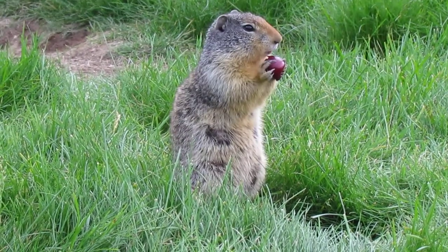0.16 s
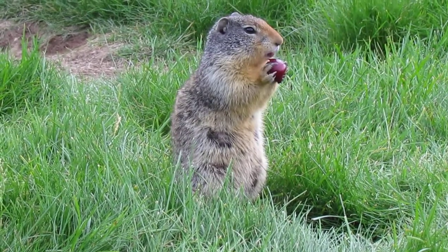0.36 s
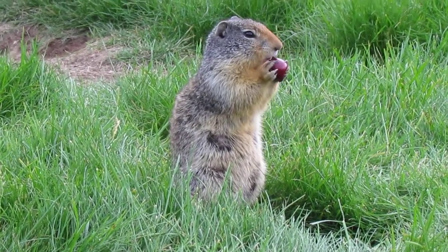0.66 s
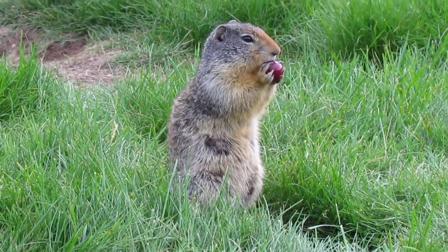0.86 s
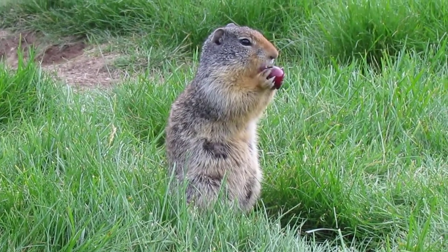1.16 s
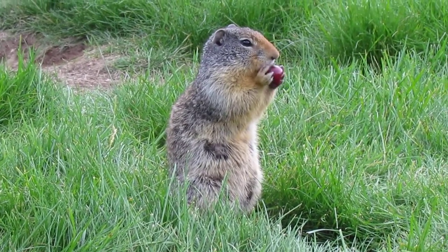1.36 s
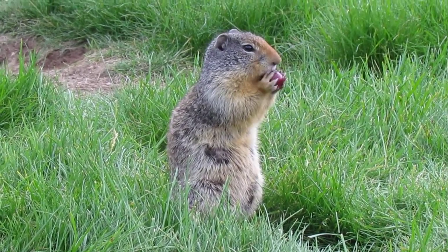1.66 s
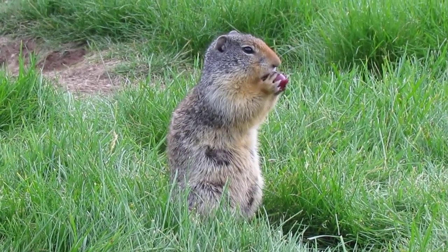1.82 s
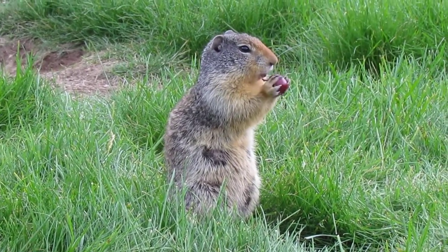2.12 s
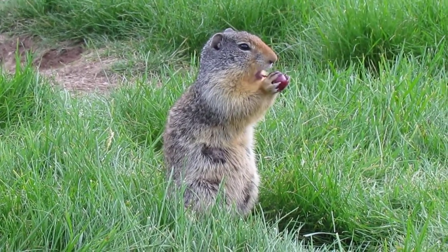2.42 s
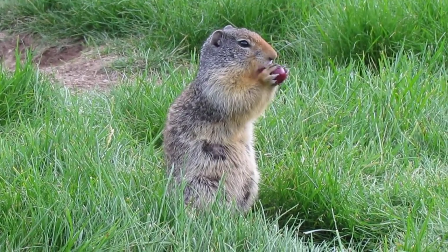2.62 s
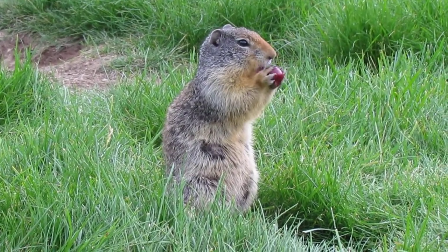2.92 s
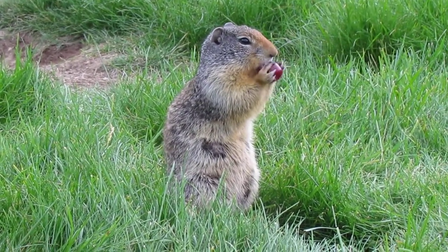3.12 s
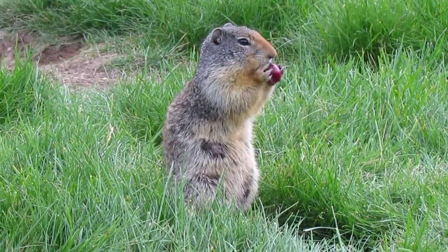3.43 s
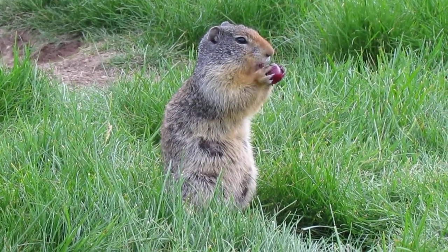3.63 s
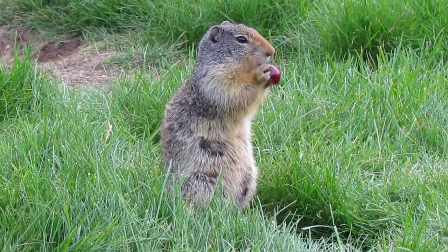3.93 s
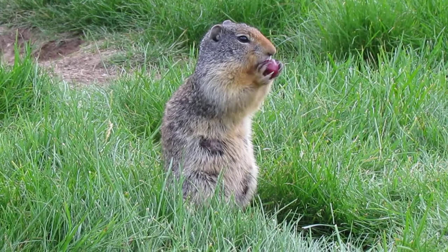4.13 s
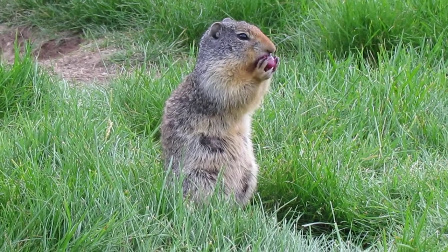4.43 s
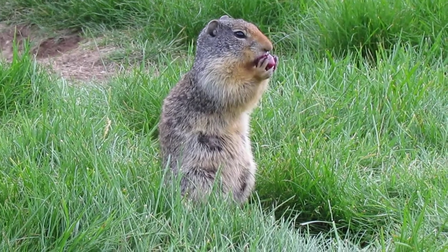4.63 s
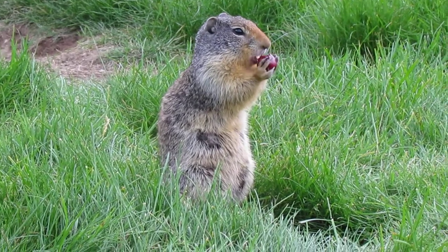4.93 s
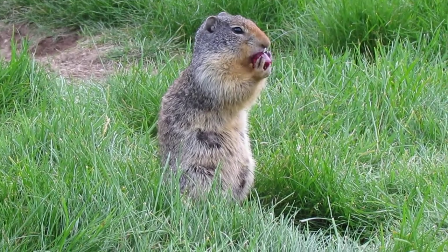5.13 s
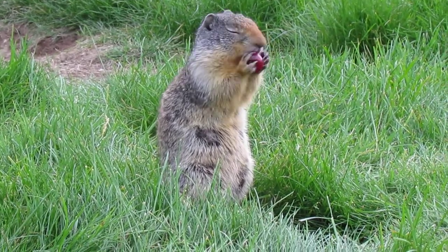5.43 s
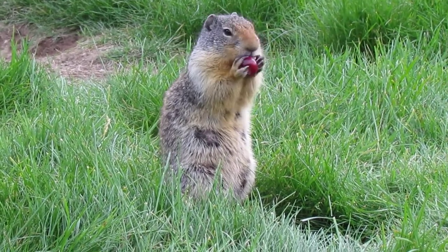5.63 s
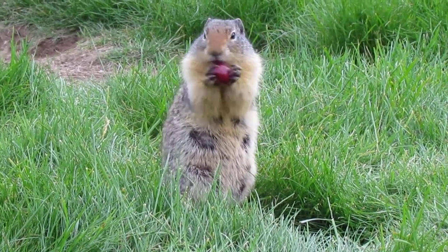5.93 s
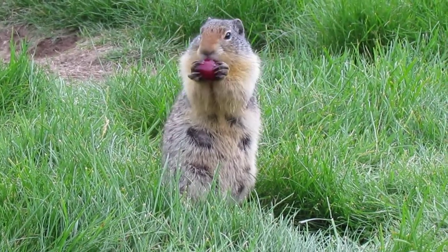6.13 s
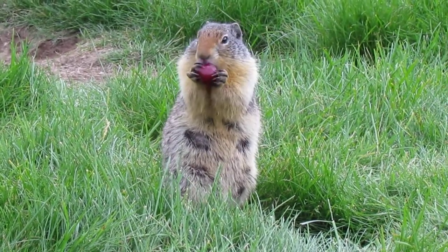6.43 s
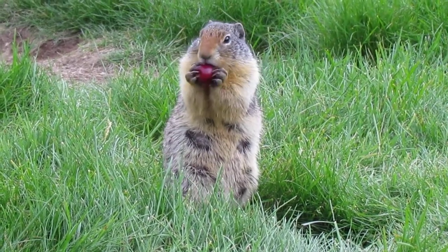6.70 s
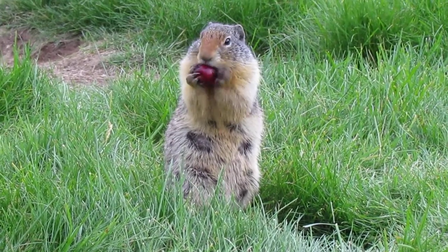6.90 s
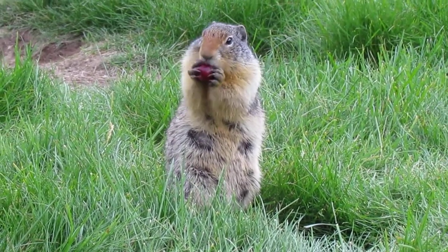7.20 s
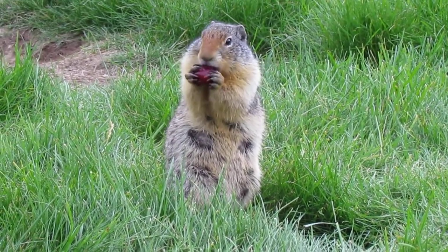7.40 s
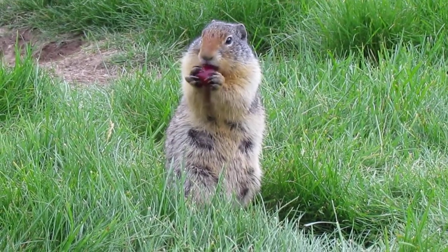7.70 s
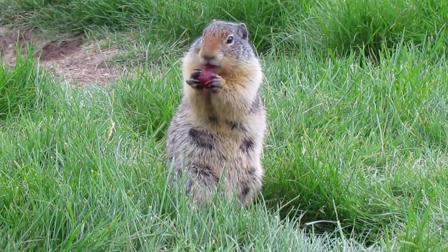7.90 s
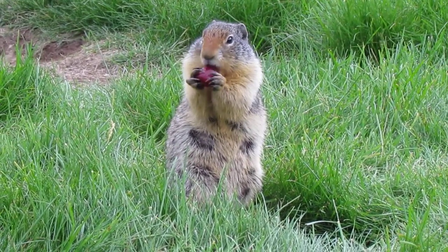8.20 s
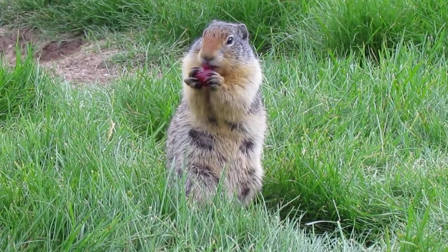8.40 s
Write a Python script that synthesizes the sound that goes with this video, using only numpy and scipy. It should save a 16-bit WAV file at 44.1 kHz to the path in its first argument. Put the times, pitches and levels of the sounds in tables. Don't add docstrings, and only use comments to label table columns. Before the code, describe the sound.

A small rodent gnaws fruit with faint crisp ticks and rustles while squirrels call around it: loud, clean, high peeps every couple of seconds, answered by distant quieter ones, with echoes off slopes and trees. A quiet outdoor hum and hiss lies behind. From the middle onward, irregular bassy wind buffets the left microphone hard, turning into heavy rumbling thuds with rough flutter, while the right stays much calmer.

```python
import sys
import numpy as np
from scipy import signal
from scipy.fft import rfft, irfft, next_fast_len
from scipy.io import wavfile
from scipy.ndimage import uniform_filter1d, map_coordinates

SR = 44100
rng = np.random.default_rng(int(sys.argv[2]) if len(sys.argv) > 2 else 0)


def linear_from_db(decibels):
    return 10 ** (np.asarray(decibels, float) / 20)


def store_pcm(level_fs):
    pcm = np.round(np.clip(level_fs, -1, 1) * 32767).astype(np.int16)
    wavfile.write(sys.argv[1], SR, np.atleast_2d(pcm).T)


N = 377055
T = np.arange(N) / SR

# [t/s, peak level/dB, f/Hz]
EDDIES = [(2.824, -24.5, 131.9), (2.922, -16, 138.1), (3.331, -22.5, 122), (3.699, -20.5, 121),
          (4.483, -18, 247), (4.523, -18.5, 149), (5.032, -14.5, 190), (5.061, -11.5, 146.7),
          (5.673, -18, 176), (5.761, -15.5, 207.3), (5.951, -10.5, 110.9), (6.215, -21, 158),
          (6.479, -10.5, 131), (6.643, -20.5, 229.9), (6.682, -13, 223.3), (6.81, -19, 238),
          (6.888, -16, 190.1), (7.084, -17, 110.3), (7.131, -17, 119.1), (7.387, -18, 182.3),
          (7.537, -19.5, 197.8), (7.616, -21.5, 138.9), (7.683, -12, 203.7), (7.768, -17.5, 122),
          (7.843, -5.5, 171.6), (8.046, -18, 150.7), (8.239, -13.5, 172.9), (8.319, -18, 110),
          (8.446, -17.5, 164)]
# [t/s, peak level/dB, f/Hz]
PUFFS = [(2.519, -34, 111), (2.86, -48, 110), (3.57, -34.5, 136), (3.866, -29, 111), (4.075, -26, 129),
         (4.176, -22.5, 109), (4.446, -21.5, 118.9), (4.557, -20.5, 110), (4.588, -19.5, 135),
         (4.715, -19.5, 137), (4.778, -17.5, 132), (4.823, -14.5, 136), (4.888, -25, 110),
         (4.932, -15.5, 144.1), (5.086, -17, 107), (5.119, -19, 226.8), (5.148, -18.5, 108),
         (5.308, -20, 176), (5.493, -14.5, 109.8), (5.518, -16, 129), (5.725, -18.5, 161),
         (5.804, -21, 242), (5.881, -13, 139), (5.904, -14.5, 148), (6.007, -16, 213.2),
         (6.029, -19.5, 240), (6.05, -13, 130), (6.071, -5.5, 131), (6.096, -11.5, 287),
         (6.115, -10.5, 296), (6.13, -13, 202), (6.147, -21, 169), (6.188, -33.5, 228), (6.249, -34, 118),
         (6.281, -24, 112.1), (6.571, -16.5, 145), (6.778, -18.5, 209.8), (6.946, -18.5, 146),
         (6.989, -14, 202.3), (7.215, -23.5, 199.6), (7.261, -22.5, 140), (7.333, -22.5, 207),
         (7.41, -17.5, 115), (7.63, -24, 110.5), (7.797, -24, 193.1), (7.965, -26, 161.9),
         (8.016, -19.5, 109.4), (8.161, -21.5, 143.6), (8.259, -11, 121.6), (8.352, -20, 140.3),
         (8.529, -24, 240)]
# [t/s, half width/s, left port level/dB, right port level/dB]
GUSTS = [(0.031, 0.03, -31.5, -43), (0.208, 0.045, -30.5, -45), (0.456, 0.092, -32.0, -41.0),
         (0.67, 0.061, -36.0, -39.0), (2.512, 0.035, -36.5, -57), (2.915, 0.04, -20.5, -48.5),
         (3.358, 0.088, -28.5, -55.5), (3.714, 0.064, -24.5, -46.5), (4.21, 0.06, -23, -57.5),
         (4.51, 0.059, -18.0, -35.5), (4.69, 0.13, -21.0, -61), (4.869, 0.084, -15.0, -38.5),
         (5.089, 0.087, -15.0, -32.5), (5.55, 0.046, -13.0, -32), (5.761, 0.097, -20.0, -60),
         (5.931, 0.043, -12.0, -59), (6.091, 0.082, -12.5, -33.5), (6.491, 0.02, -11.5, -29),
         (6.661, 0.069, -17.5, -35), (6.82, 0.032, -17.5, -42.5), (6.947, 0.078, -17.0, -35.5),
         (7.081, 0.11, -18, -35), (7.402, 0.034, -17.5, -37.5), (7.668, 0.093, -20.5, -37),
         (7.85, 0.064, -16, -39.5), (8.08, 0.058, -15, -32), (8.272, 0.065, -16, -39),
         (8.462, 0.032, -18, -69)]


def unit(x):
    return x / np.sqrt(np.mean(x ** 2) + 1e-20)


def along(points, hz):
    f, v = np.transpose(points)
    return np.interp(np.log(hz + 1), np.log(f + 1), v)


def wobble(rate):
    knots = rng.standard_normal(int(N * 200 / SR) + 4)
    return map_coordinates(knots, [T * min(rate, 200)])


def filtered(x, response):
    m = next_fast_len(x.shape[-1] + 8192)
    return irfft(rfft(x, m) * response(np.fft.rfftfreq(m, 1 / SR)), m)[..., :x.shape[-1]]


def add(out, s, sound):
    part = out[:, round(s * SR):][:, :sound.shape[1]]
    part += sound[:, :part.shape[1]]


def sides(pan_db):
    return linear_from_db([[min(pan_db, 0)], [min(-pan_db, 0)]])


def ducking():
    above_db, slope, recover_s, gust_crest_db = -9, 1.53, 0.52, 4.5
    blows = [(s, db) for s, db, _ in list(EDDIES) + list(PUFFS)]
    blows += [(s, db + gust_crest_db) for s, _, db, _ in GUSTS]
    dips = [0 * T]
    for s, db in blows:
        if db > above_db:
            dips.append(slope * (db - above_db) * (T > s) * np.exp(-np.abs(T - s) / recover_s))
    return -uniform_filter1d(np.max(dips, axis=0), size=2000)


def meadow():
    # [f/Hz, level per Hz/dB]
    spectrum = [(15, -36), (25, 4.5), (240, -7), (450, -14), (900, -13), (1370, -16), (5000, -27.5),
                (16000, -37.5)]
    # [f/Hz, correlation]
    alike = [(60, 1), (240, 0.62), (950, 0.45), (3770, -0.0), (15000, 0.09)]

    def turn(hz):
        return np.arccos(np.clip(along(alike, hz), -1, 1)) / 2

    def mid_side(hz):
        return linear_from_db(along(spectrum, hz)) * [np.cos(turn(hz)), np.sin(turn(hz))]

    mid, side = filtered(rng.standard_normal((2, N)), mid_side)
    drone = unit(filtered(rng.standard_normal(N), lambda hz: abs(hz - 930) < 9))
    mid += linear_from_db(-20.5) * mid.std() * drone
    return linear_from_db(-48.5 + ducking()) * unit(np.array([mid + side, mid - side]))


def strength():
    # [t/s, left port level/dB, right port level/dB]
    breeze = [
        (0.0, -43.5, -47.0),
        (1.1, -44.5, -40),
        (1.45, -47.0, -44.5),
        (2.0, -51.0, -52),
        (2.6, -46.5, -49.5),
        (4.3, -32.0, -46),
        (5.3, -27.5, -42.0),
        (6.35, -31, -33.5),
        (7.4, -28.0, -42.5),
        (8.55, -24, -39.5),
    ]
    s, *levels_db = np.transpose(breeze)
    power = linear_from_db(2 * np.array([np.interp(T, s, db) for db in levels_db]))
    for s, width, left_db, right_db in GUSTS:
        power += linear_from_db(2 * np.array([[left_db], [right_db]])) * np.exp(-((T - s) / width) ** 2)
    return 10 * np.log10(power)


def port(level_db, swirl, lumps_db, calm_db, quicken):
    lumps = lumps_db * (0.2248 * wobble(18) + .7 * wobble(50) + .65 * wobble(130))
    speed = np.clip(linear_from_db(quicken * (level_db + 0.55 * lumps - calm_db)), .45, 3)
    frozen = unit(filtered(rng.standard_normal(3 * N), lambda f: linear_from_db(along(swirl, f))))
    flow = linear_from_db(lumps) * map_coordinates(frozen, [np.cumsum(speed)], order=3)
    power = uniform_filter1d(uniform_filter1d(flow ** 2, size=4000), size=4000)
    return linear_from_db(level_db) * flow / np.sqrt(np.abs(power) + 1e-9)


def wind():
    # [f/Hz, level/dB]
    swirl = [(20, -55), (40, -4.5), (80, 2), (150, -0.5), (250, -5.5), (400, -13.5), (700, -28),
             (1500, -70)]
    # [f/Hz, level/dB]
    lee = [(20, -14), (40, -3), (70, 1.5), (120, 3), (170, -14.5), (260, -39.5), (400, -42.5), (800, -86.5)]
    # [f/Hz, level/dB]
    tear = [(100, -8.5), (300, 1), (500, -2.5), (900, -12.5), (1600, -22.5), (3000, -58.5)]
    # [t/s, peak level/dB]
    snaps = [(4.229, -34), (4.494, -33), (4.524, -32.5), (4.558, -28), (4.591, -31), (7.855, -22.5),
             (8.085, -23.5), (8.141, -32.5), (8.24, -29.5), (8.265, -31), (8.305, -31), (8.326, -29.5),
             (8.373, -32), (8.392, -28), (4.824, -23.5), (5.038, -22), (5.12, -20.5), (5.169, -26.5),
             (5.521, -19), (5.572, -22), (5.6, -24), (5.724, -25), (5.92, -22.5), (6.011, -25),
             (6.081, -18), (6.116, -15), (6.141, -19), (6.15, -16), (6.191, -33.5), (6.216, -23),
             (6.222, -18), (5.949, -27), (7.769, -24), (7.97, -26.5), (8.019, -31), (6.059, -21),
             (6.03, -24), (6.482, -32.5), (6.647, -23.5), (6.679, -20), (6.812, -20.5), (6.952, -19),
             (6.996, -25), (7.098, -27), (7.263, -23), (7.415, -23.5), (7.683, -25.5), (7.846, -19),
             (8.046, -20.5), (8.066, -24.5), (8.159, -24), (8.449, -23)]
    left_db, right_db = strength()
    left = port(left_db - 1.5, swirl, lumps_db=4.0, calm_db=-15.5, quicken=.3)
    right = port(right_db + 0.327, lee, lumps_db=3.0, calm_db=-37, quicken=0.13)
    out = np.array([left, right])
    t = np.arange(-900, 900) / SR
    for s, db, hz in list(EDDIES) + list(PUFFS):
        turn = rng.uniform(0, 2 * np.pi)
        cycles = hz * t * (1 + 0.65 * t * hz)
        thump = np.exp(-2.5 * (t * hz) ** 2) * np.sin(2 * np.pi * cycles + turn)
        add(out, s + 0.005265 + t[0], linear_from_db(db + 8.0) * thump * linear_from_db([[0], [-30]]))
    for s, db in snaps:
        haste = linear_from_db(0.28 * (db + 18.0))
        swell = np.exp(-(t / 0.003) ** 2) + 0.091 * (t > 0) * np.exp(-t / 0.022)
        burst = rng.standard_normal(len(t)) * swell
        burst += rng.choice([-1, 1]) * 1.26 * np.exp(-(t / 0.0003) ** 2)
        burst = filtered(burst, lambda f: linear_from_db(along(tear, f / haste)))
        add(out, s + 0.002994 + t[0], linear_from_db(db + 14.0) * burst / np.abs(burst).max() * linear_from_db([[0], [-40]]))
    return filtered(out, lambda f: f ** 2 / (f ** 2 + 24 ** 2))


def nibbling():
    # [t/s, peak level/dB, middle level/dB, low level/dB]
    bites = [(0.108, -41, -12, -24), (0.4434, -39.5, 9, -8), (0.7038, -42.5, -4, -24),
             (0.904, -43, -26.5, -29), (1.022, -46, -21, -21), (1.5839, -31.5, -6, -18.5),
             (1.845, -47, -27, -14), (3.109, -38, -4, -16), (3.297, -39.5, -24, -24),
             (3.4894, -37.5, -20, -20), (3.686, -41.5, -28, -29), (3.8067, -41.5, 0, -26),
             (4.097, -38.5, 7, -20), (4.3131, -46.5, 6, -21), (4.383, -42.5, 3, -24),
             (4.563, -43.5, -2, -27), (5.521, -45, -3, -30), (5.5432, -30.5, -26, -33),
             (5.89, -33.5, -10, -24.5), (6.23, -41.5, -31, -32), (6.6777, -47.5, -21, -25),
             (7.139, -37, -38, -33), (7.1636, -33.5, -32, -37), (7.28, -24.5, -25, -41),
             (7.3764, -34, -0.5, -5.5), (7.5352, -31.5, -30, -38), (7.694, -43.5, -19, -27),
             (7.847, -44.5, -4, -8), (8.088, -29.5, -8, -25)]
    nibbles = [.092, .266, 1.55, 1.569, 1.591, 1.72, 2.139, 2.299, 2.408, 3.115, 3.345, 3.471, 3.556, 3.638,
               4.54, 4.88, 5.049, 5.177, 5.465, 5.57, 5.591, 5.606, 6.744, 7.119, 7.124, 7.134, 7.409, 7.5,
               7.525, 7.541]
    # [peak level/dB, middle level/dB, low level/dB]
    nibble_db = (-50.5, -17, -27)
    # [t/s, length/s, centre f/Hz, level/dB]
    rustle = [(1.023, .02, 12000, -62), (1.735, 0.025, 13000, -63), (1.838, 0.031, 13100, -62.5),
              (2.315, 0.021, 11400, -54), (3.107, 0.0155, 9200, -67), (3.324, .03, 9360, -55.5),
              (3.493, 0.025, 11000, -58), (4.558, .03, 10850, -58), (4.71, .03, 3448, -57),
              (5.36, 0.015, 12000, -60.5), (5.538, 0.029, 11250, -59), (5.666, 0.036, 9500, -63),
              (5.702, 0.013, 9800, -56), (5.97, 0.023, 6300, -58.5), (6.66, 0.044, 11900, -65),
              (7.281, 0.026, 9600, -55.5), (7.394, 0.0052, 3490, -42), (7.408, 0.014, 3402, -45),
              (7.396, 0.038, 9200, -57.5), (7.466, 0.02, 3820, -50), (7.482, 0.029, 3443, -51),
              (7.53, 0.033, 3800, -61), (7.575, 0.044, 3497, -60), (7.363, 0.0076, 9000, -63),
              (7.502, 0.023, 8960, -54), (7.612, 0.036, 9400, -61), (7.789, 0.017, 12100, -66)]
    out, t = np.zeros((2, N)), np.arange(1024) / SR
    for s, db, middle_db, low_db in list(bites) + [(s, *nibble_db) for s in nibbles]:
        crack = rng.standard_normal(len(t)) * linear_from_db(-60 * t / 0.006)
        tint = [(500, -70), (1300, low_db), (2200, low_db + 19.5), (3600, low_db + 19.5),
                (5700, middle_db), (7500, middle_db + 3), (9000, 2.0), (14000, -13)]
        crack = filtered(np.roll(crack, 200), lambda f: linear_from_db(along(tint, f)))
        add(out, s - 200 / SR, linear_from_db(db + 5) * sides(-2.5) * crack)
    u = np.arange(-2000, 2000) / SR
    for s, length, hz, db in rustle:
        clumps = linear_from_db(4.9 * np.repeat(rng.standard_normal(100), 40))
        grains = rng.standard_normal((2, len(u))) * clumps
        band = filtered(grains[:1] + .5 * grains,
                        lambda f: np.exp(-.5 * (np.log(f / hz + 1e-6) / 0.25) ** 2))
        add(out, s + u[0], linear_from_db(db) * unit(band) * np.exp(-3.5 * (u / length) ** 2))
    return out


def chirp(length, hz, dying):
    sag_depth, sag_lead_s, plunge_lag_s, plunge_per_s = 0.019, 0.0054, 0.0044, 14.3
    t = np.arange(4400) / SR
    slack = 0.003 * np.logaddexp(0, (t - length) / 0.0044)
    sag = sag_depth / (1 + np.exp((length - sag_lead_s - t) / 0.0018))
    plunge = plunge_per_s * .0012 * np.logaddexp(0, (t - length - plunge_lag_s) / .0012)
    rise = 0.012 * np.exp(-t / 0.0042) + 0.0251 * np.exp(-t / 0.018)
    pitch = hz * (1 - rise - sag - np.minimum(plunge, .4))
    swell = (1 - np.exp(-t / 0.00081)) * (1 - .5 * np.exp(-t / 0.016))
    fade = linear_from_db(-9 * slack / dying - 5 * (slack / dying) ** 3)
    return 2 * np.pi * np.cumsum(pitch) / SR, np.sqrt(2) * swell * fade


def scatter(echoes):
    t = np.arange(SR // 2) / SR
    shape = np.zeros((2, len(t)))
    for delay, spread, left_db, right_db in echoes:
        cloud = (t >= delay) * np.exp(-(t - delay) / spread)
        shape += linear_from_db([[left_db], [right_db]]) * cloud / np.linalg.norm(cloud)
    return shape * rng.standard_normal(shape.shape)


def squirrels():
    # [t/s, length/s, top f/Hz, level/dB, overtone level/dB]
    near = [
        (0.3373, 0.055, 4522, -10.5, -5),
        (2.219, 0.057, 4500, -11.5, -6),
        (4.388, 0.045, 4480, -14, -7),
        (6.825, 0.057, 4519, -19, -3.5),
    ]
    across = [
        (0.149, 0.079, 5020, -54.5, -14),
        (1.374, 0.058, 5057, -39.5, -23),
        (2.367, 0.054, 5036, -34.5, -35),
        (3.276, 0.062, 5047, -36.5, -24),
        (4.781, 0.055, 5074, -37.5, -19),
        (5.704, 0.056, 5044, -40.5, -23),
        (6.623, 0.053, 5007, -35.5, -26),
        (7.849, 0.064, 5040, -52, -24),
    ]
    left = [
        (1.110, 0.038, 4885, -46, 9),
        (3.067, 0.039, 4900, -38.5, 3.5),
        (5.02, 0.04, 4895, -30.5, -4.5),
        (6.964, 0.041, 4900, -36.5, -7),
    ]
    high = [
        (0.451, 0.044, 5590, -37, -23),
        (2.21, 0.055, 5580, -39, -38),
        (4.098, 0.044, 5580, -35, -28),
        (7.746, 0.042, 5530, -47, -28),
    ]
    hidden = [(s, .06, 5120, -72.5, 0) for s in [.69, 1.71, 2.791, 3.89, 5.18, 6.19, 7.291]]
    bird = [
        (2.078, 0.05, 3310, -62, -29),
        (2.485, 0.061, 3170, -60.5, -30),
    ]
    slap_db = [-51.5, -66, -63, -55, -43, -56, -67, -60]
    slope_db = [-38.5, -40.5, -43.5, -45.5]
    slap = [(s + .127, length, hz, db, -16) for (s, length, hz, *_), db in zip(across, slap_db)]
    slope = [(s + .1, length - .006, hz, db, -5) for (s, length, hz, *_), db in zip(near, slope_db)]
    animals = [near, across, left, high, hidden, bird, slap, slope]
    # [tone left-right/dB, overtone left-right/dB, tone left lead/rad, overtone left lead/rad]
    paths = [
        (11.2, 9.5, 4, -2.5),
        (-7, -1.5, -1.5, 2),
        (15, 5.5, 1.5, 3.5),
        (12.5, 1, 1.6, -2),
        (-2, -15, 2, 5.5),
        (0.1, 10, 1.5, 2),
        (11, 4.5, 2, 2.5),
        (17, 15, 4, -2.5),
    ]
    # [overtone in echoes/dB, third partial/dB, dying/s, plunge's escape from a dip in the path/0-1]
    voices = [
        (-10.5, -40.5, 0.0079, 0),
        (-20, -68, 0.007, 0.35),
        (-11, -72.5, 0.0092, 0.65),
        (-15, -70, 0.009, 0),
        (-11, -72, 0.013, .4),
        (-24, -70, 0.0045, .1),
        (-20.5, -72, 0.005, 0),
        (-8, -70, .005, 0),
    ]
    # [delay/s, spread/s, left level/dB, right level/dB]
    surfaces = [
        [(.088, .009, -49, -66), (.115, .02, -52, -59), (.205, .006, -55, -61), (0.08, 0.17, -51, -58)],
        [(.012, .06, -52, -57), (0.12, .15, -57, -64.5)],
        [(0.023, 0.0011, -64, -64), (.057, .0004, -58, -67), (.092, 0.0005, -58, -68), (0.027, 0.1, -58, -68)],
        [(.045, .01, -59, -75), (.05, 0.11, -71, -78)],
        [(.005, .05, -63.5, -64.5), (.09, .04, -63, -66), (.1, .15, -66, -72)],
        [(.02, 0.038, -69, -79)],
        [(.003, .02, -62.5, -67.5)],
        [(.004, .01, -60, -70)],
    ]
    out, far, half = np.zeros((2, N)), np.zeros((2, N)), np.array([[.5], [-.5]])
    for calls, path, character, echoes in zip(animals, paths, voices, surfaces):
        pan_db, pan2_db, lead, lead2 = path
        echo2_db, third_db, dying, slip = character
        levels = [c[3] for c in calls]
        for s, length, hz, db, over_db in calls:
            phase, env = chirp(length, hz, dying)
            fall = np.clip(1 - np.gradient(phase) * SR / (2 * np.pi * hz), 0, .12) / 0.2
            fall[:round(length * SR / 2)] = 0
            escape = linear_from_db(slip * (max(levels) + 6 - db) * np.minimum(4 * fall, 1))
            tone = escape * sides(pan_db) * np.sin(phase + lead * half)
            over = linear_from_db(over_db - 9.1 * fall) * sides(pan2_db) * np.sin(2 * phase + lead2 * half)
            third = linear_from_db(third_db) * sides(7) * np.sin(3 * phase)
            noise = rng.standard_normal((2, len(env)))
            hiss = filtered(noise, lambda f: (f > 4800) / (1 + (f / 11500) ** 6))
            shake = np.interp(np.arange(len(env)), np.arange(0, 4401, 200), rng.standard_normal(23))
            flutter_db = 1 * (calls is not near)
            tone *= linear_from_db(flutter_db * shake * (1 + 5 * fall))
            add(out, s, linear_from_db(db) * env * (tone + over + third + linear_from_db(-29.5) * sides(15.0) * hiss))
            carried = linear_from_db(slip * 12 * np.minimum(5 * fall, 1))
            voice = env * (carried * np.sin(phase) + linear_from_db(echo2_db) * np.sin(2 * phase))
            effort = linear_from_db(0.062 * (db - np.mean(levels)))
            add(far, s, effort * signal.fftconvolve(voice[None], scatter(echoes), axes=1))
    return out + far * linear_from_db(1.2 * wobble(90) + 0.5)


def scene():
    return meadow() + wind() + nibbling() + squirrels()


def thinned(x):
    # [t/s, length/s, from f/Hz, to f/Hz]
    emptied = [(1.112, .025, 12100, 15700), (1.13, .035, 10200, 10800), (2.375, .05, 5500, 6200),
               (3.075, .015, 10300, 15500), (4.10, .015, 7300, 8200), (4.41, .035, 5100, 5900),
               (4.80, .045, 5600, 6300), (4.827, .01, 10500, 11700), (5.022, .07, 10200, 11500),
               (5.03, .06, 12000, 15700), (6.83, .07, 5100, 5700)]
    overtone = filtered(x[0], lambda f: (f > 8300) & (f < 9900))
    level_db = 10 * np.log10(np.abs(uniform_filter1d(overtone ** 2, size=900)) + 1e-12)
    top = filtered(x, lambda f: f > 13900) * uniform_filter1d(1. * (level_db > -35), size=200)
    gap = filtered(x, lambda f: (f > 10300) & (f < 12500)) * uniform_filter1d(1. * (level_db > -19), size=200)
    out = x - .93 * (top + gap)
    for s, length, low_hz, high_hz in emptied:
        part = out[:, round(s * SR):][:, :round(length * SR)]
        band = filtered(part, lambda f: (f > low_hz) & (f < high_hz))
        add(out, s, -signal.windows.tukey(part.shape[1], .3) * band)
    return out


def band_limit(x):
    return signal.sosfilt(signal.butter(12, 16460, fs=SR, output="sos"), x)


def record(dry):
    held = dry / (1 + np.abs(dry) ** 8) ** (1 / 8)
    held = held * np.minimum((N - np.arange(N)) / 200, 1)
    band = filtered(thinned(held), lambda f: (f < 15750) / (1 + (f / 15600) ** 14))
    return band_limit(band)


dry = scene()
out = record(dry)
store_pcm(out)
```